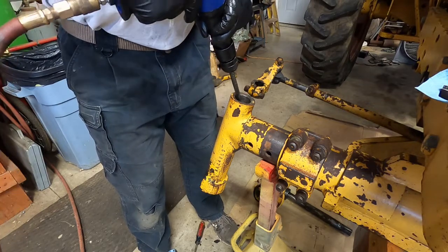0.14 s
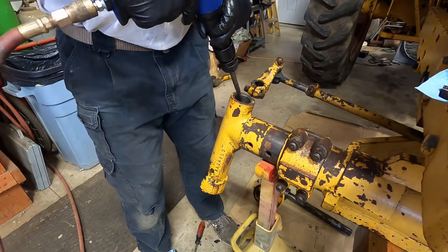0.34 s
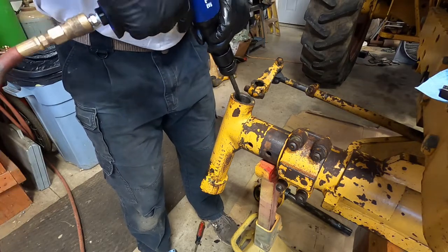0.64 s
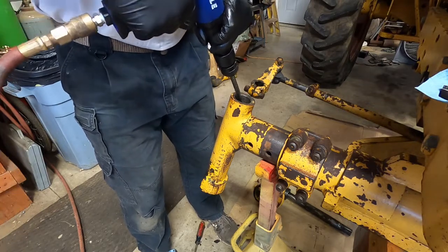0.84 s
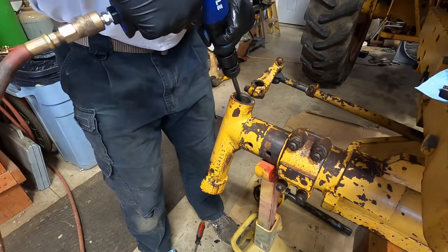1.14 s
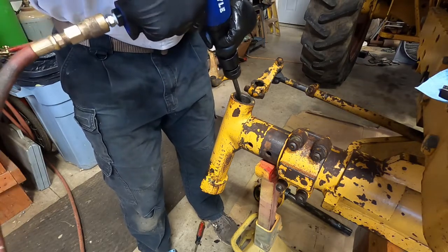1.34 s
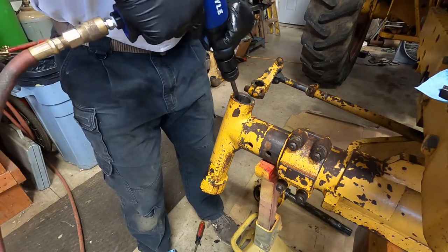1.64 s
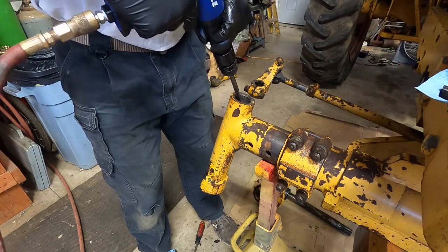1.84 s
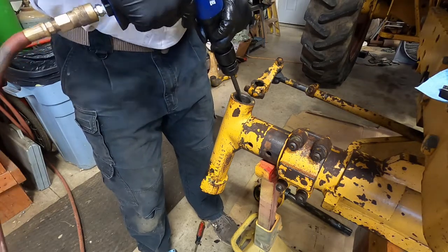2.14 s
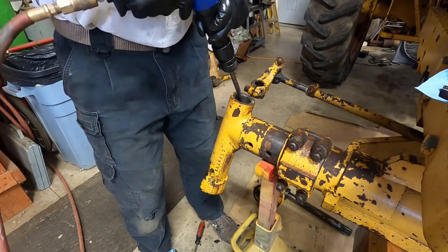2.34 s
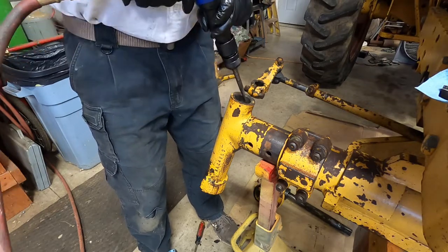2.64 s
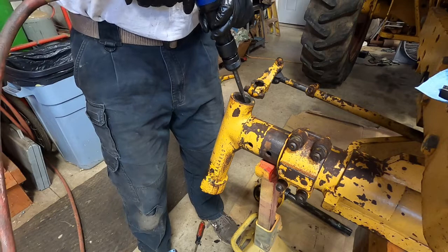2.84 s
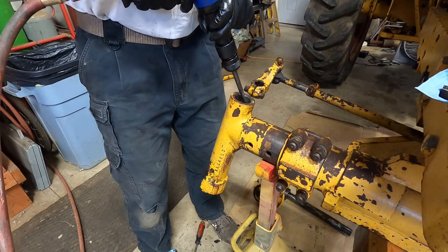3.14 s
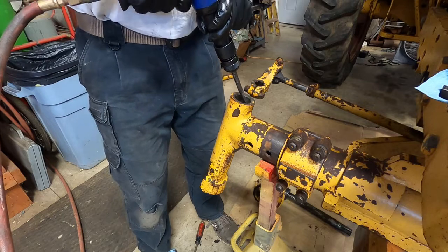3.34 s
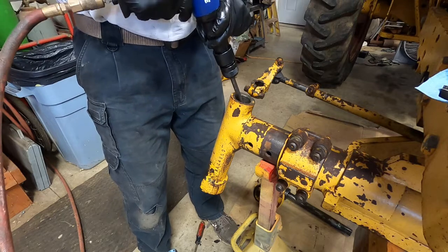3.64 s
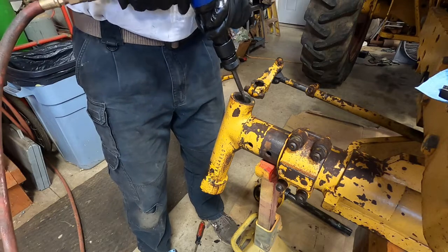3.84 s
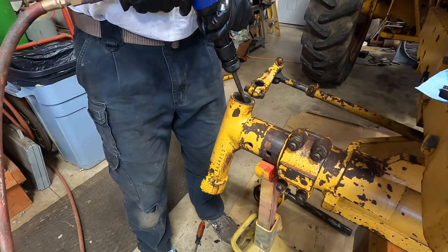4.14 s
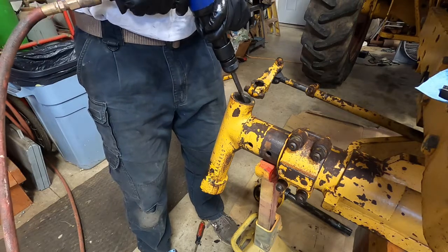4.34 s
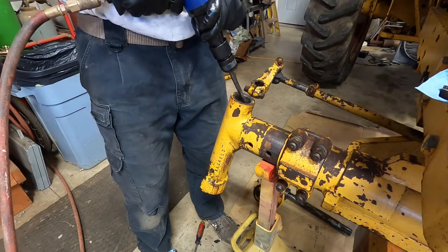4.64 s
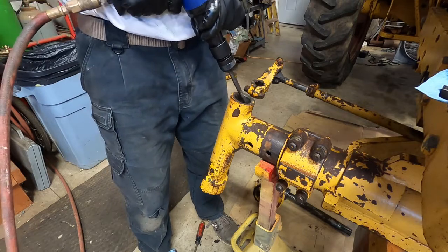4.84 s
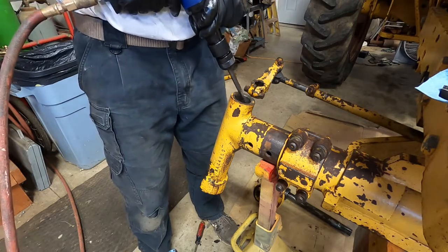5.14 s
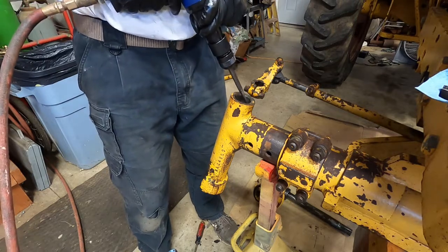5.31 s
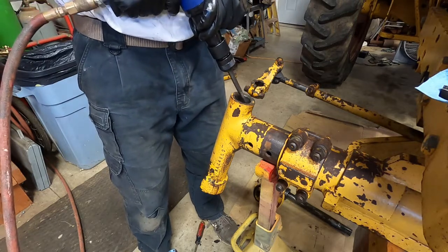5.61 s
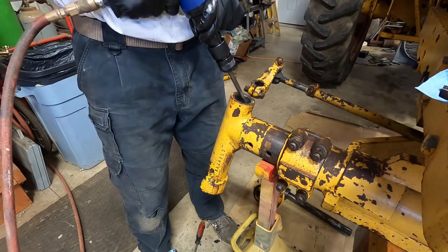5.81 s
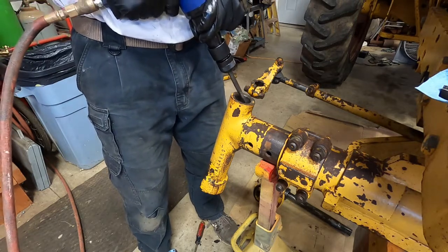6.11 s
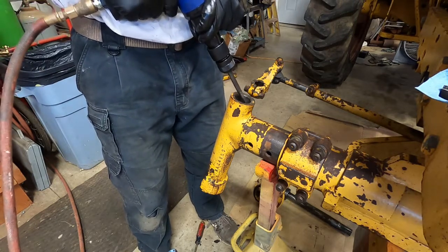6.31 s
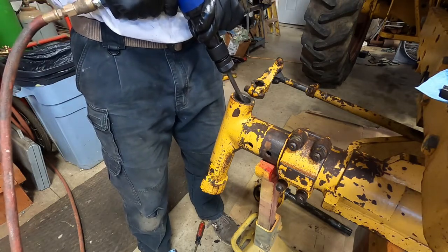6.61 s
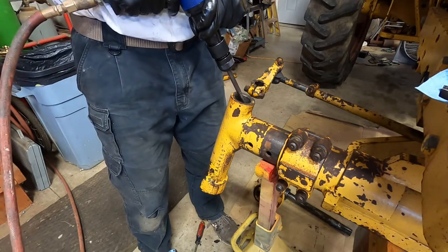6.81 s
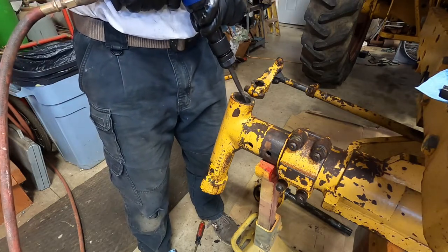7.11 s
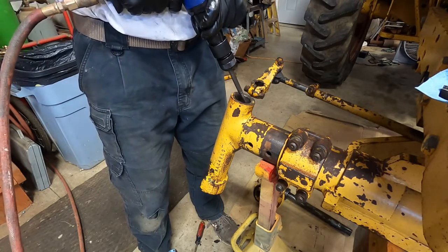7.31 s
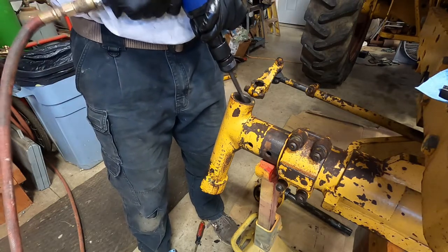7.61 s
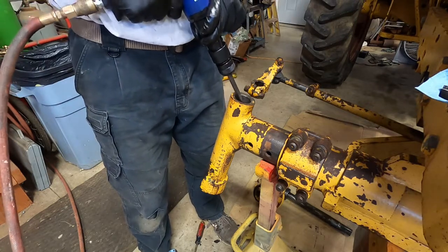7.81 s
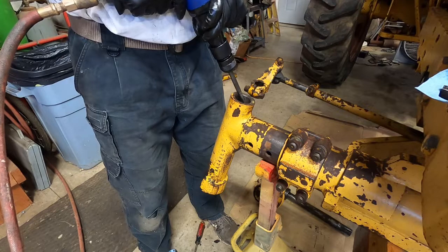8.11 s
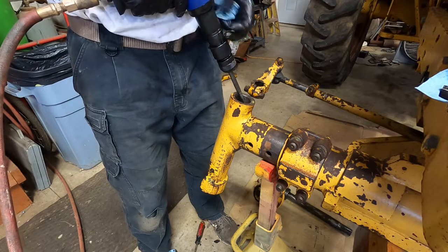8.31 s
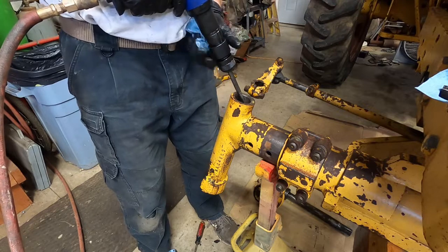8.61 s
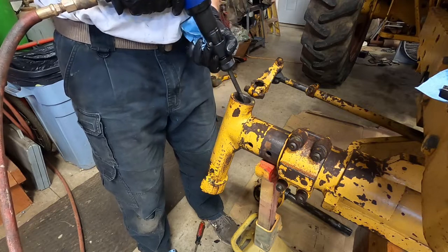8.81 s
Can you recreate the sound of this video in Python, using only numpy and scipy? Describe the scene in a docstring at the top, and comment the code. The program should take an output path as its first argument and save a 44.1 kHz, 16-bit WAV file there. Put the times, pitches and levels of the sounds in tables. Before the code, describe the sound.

Stop-start pneumatic hammering on heavy metal, each burst opening with a puff of hissing air, rings through a reverberant garage over a faint throbbing hum.

```python
"""An air hammer drives a steel bushing out of a tractor axle in short bursts, in a reverberant workshop.
Each burst opens with a rush of air: shaped noise plus a faint whistle. Each piston stroke is an
exhaust pulse with a noise spit and, a few ms later, a blow: noise crack, ringing modes, dull thud.
The loose chisel ticks and clanks, grip rubs are swelling noise; a motor hums (beating sines) and
a hose coupling leaks (hiss). Decaying noise bands form the room."""
import sys
import numpy as np
from scipy import signal
from scipy.fft import rfft, irfft, next_fast_len
from scipy.io import wavfile

SR = 44100
rng = np.random.default_rng(int(sys.argv[2]) if len(sys.argv) > 2 else 0)


def store_pcm(level_fs):
    """Save levels as 16-bit WAV."""
    pcm = np.round(np.clip(level_fs, -1, 1) * 32767).astype(np.int16)
    wavfile.write(sys.argv[1], SR, np.atleast_2d(pcm).T)


N = 395136
TIME_S = np.arange(N) / SR
MS = 1e-3

# All table levels are relative: the functions add trims.
# bursts: first stroke t/s, last stroke t/s, valve lead/s, air rush level/dB, thump level/dB,
# blow level/dB, limp/ms
BURSTS = [(1.0316, 1.1256, 0.059, -27, 3.5, -10, 0.5), (1.4159, 1.576, 0.064, -34.5, 3, -10, 5.5),
          (3.5552, 3.592, .095, -27.5, 4.5, -14.5, -2), (3.6159, 3.757, .01, -35.5, 4, -11, 0),
          (4.9533, 5.0967, 0.05, -31, 3.5, -13.5, 0), (5.8662, 6.06, 0.059, -32.5, 4, -12, 0.5),
          (6.3209, 6.7793, 0.088, -38.5, 3, -12, 7), (7.635, 8.0203, 0.049, -30.5, 3, -12, 0.5)]
# how the tool is leant on, one curve per burst: t/s, mean stroke period/ms, chisel ring level/dB
LEAN = [
    [(1.055, 30.3, -30), (1.086, 40, -43.5)],
    [(1.44, 34, -29), (1.548, 32.1, -27)],
    [(3.58, 34, -15.5)],
    [(3.638, 38, -13), (3.717, 34.8, -35.5)],
    [(4.977, 38.6, -14.5), (5.016, 38.2, -16.5), (5.056, 40.6, -51.5)],
    [(5.892, 37, -37), (5.928, 40.2, -14.5), (6.014, 45.9, -17)],
    [(6.345, 35, -21.5), (6.623, 34.1, -31), (6.656, 42.4, -19), (6.701, 32.2, -41.5), (6.735, 48.3, -31.5)],
    [(7.659, 28.9, -53.5), (7.714, 33, -17.5), (7.752, 36, -17.5), (7.79, 28.8, -35.5),
     (7.852, 44.3, -23.5), (7.905, 38, -44), (7.976, 39.8, -57)],
]
# single strokes, trigger feathered: t/s, thump level/dB, blow level/dB, chisel ring level/dB
STUTTERS = [(6.1223, -6, -42.5, -51), (6.2118, -5, -39.5, -32.5), (6.292, -0.5, -27.5, -29.5)]
# light knocks of the chisel on its seat: t/s, tick level/dB, axle ring level/dB
KNOCKS = [(0.269, -38.5, -67.5), (0.5295, -34.5, -41), (0.87, -49.5, -61.5), (1.3602, -23, -46),
          (1.652, -10.5, -31.5), (1.7957, -15, -41.5), (1.9066, -36.5, -44), (2.242, -46.5, -54.5),
          (2.2724, -64.5, -50.5), (2.5046, -40, -63), (2.588, -42.5, -57), (2.9097, -55, -43.5),
          (3.1074, -40.5, -49.5), (3.1873, -50, -40.5), (3.937, -17.5, -34), (4.2609, -23, -37),
          (5.2863, -21, -32.5), (5.3072, -17.5, -59.5), (6.2286, -10.5, -27), (7.0399, -24, -41.5),
          (7.2971, -49.5, -48.5), (8.0995, -10.5, -38), (8.1904, -24, -62.5)]
# gloves and hose rubbing: start t/s, end t/s, centre f/Hz, level/dB
RUBS = [(2.474, 2.843, 680, -65.5), (3.046, 3.425, 1750, -60), (8.662, 8.89, 2420, -71)]
# background: t/s, hum level/dB, leak level/dB
BACKGROUND = [(0.1, -49.5, -70), (0.72, -50, -65.5), (0.9, -55, -62.5), (2.1, -58.5, -70),
              (2.676, -49.5, -63.5), (3.42, -39, -60), (4.25, -57.5, -70), (4.356, -50, -70),
              (4.88, -45, -63), (5.55, -48.5, -71), (5.768, -49, -66.5), (7.15, -49, -74),
              (7.532, -43.5, -68), (8.45, -51.5, -81), (8.9, -44, -69.5)]
# beating motor tones: mean f/Hz, level/dB
HUM = [(88.8, 0), (72, -2.5), (75, -17.5), (228, -17)]

# modes of chisel and bushing: f/Hz, level/dB, t60/s
CHISEL_MODES = [(960, -7, 0.075), (2570, -4.5, 0.046), (2910, -0.5, 0.023), (3126, -7.5, .03),
                (3800, -11.5, 0.045), (5390, -10, 0.022), (6170, -19.5, .03), (7900, -25, 0.025),
                (7900, -21, 0.092)]
# main modes of the axle housing: f/Hz, level/dB, t60/s
AXLE_MODES = [(730.6, -2, 0.55), (912, -3, 0.31), (1015.3, -0.5, 0.24), (1102, -5.5, .25),
              (1437, -6.5, 0.16), (2617, -6.5, .2)]
# standing waves between floor and tractor: f/Hz, level/dB, t60/s
BOOM_MODES = [(141, -4.5, 0.081), (172.5, -0.5, 0.14), (232, 3, 0.14)]

# exhaust turbulence, also after-hits: f/Hz, level/dB per Hz
SPIT_COLOUR = [(300, 1), (600, 3), (1000, 15), (1700, 0.5), (3000, 2.5), (4300, 8.5), (5800, -10),
               (8200, -1), (10200, -4), (12000, -20.5), (16000, -33)]
# piston on chisel: f/Hz, level/dB per Hz
CRACK_COLOUR = [(400, -24.5), (1200, -0.5), (3000, -1.5), (5000, -7.5), (6300, 0.5), (8500, -1), (9300, -5),
                (11000, -12.5), (12500, -34.5), (16000, -37)]
# air through the opening valve: f/Hz, level/dB per Hz
RUSH_COLOUR = [(1200, -9.5), (3000, -10.5), (3700, -7.5), (5300, -20), (7200, -4), (10300, 2), (12000, -11),
               (16000, -21)]
# hose coupling leak: f/Hz, level/dB per Hz
LEAK_COLOUR = [(1760, -44.5), (3000, -7.5), (3230, -3.5), (6460, 0.5), (7150, -3), (11900, -10),
               (15000, -17)]
# dull shop noise: f/Hz, level/dB per Hz
SHOP_COLOUR = [(15, -66.5), (25, -24), (87, -9.5), (201, -19), (235, -22.5), (622, -42), (711, -32),
               (777, -43), (5000, -49.5), (6500, -83.5), (11000, -120)]
# light touch of the chisel: f/Hz, level/dB per Hz
TICK_COLOUR = [(400, -22), (1200, -5.5), (2600, 2), (4200, -3), (5500, -6), (7300, -4.5), (9500, -14),
               (14000, -30)]
# casting under a hard blow: f/Hz, level/dB per Hz
CLANG_COLOUR = [(200, -17), (390, 1.5), (540, -4.5), (730, -5), (1000, -3), (1350, -10.5), (3000, -11),
                (6000, -33.5)]
# casting under a soft knock: f/Hz, level/dB per Hz
CLUNK_COLOUR = [(200, -20), (390, -0.5), (540, -6.5), (730, -0.5), (1050, -7.5), (1600, -16), (3000, -20.5),
                (6000, -42)]

# hall response by band: centre f/Hz, level/dB, tail t60/s
ROOM = [(60.3, -24.5, 1.3), (180, -13, 0.73), (452, -8.5, 0.73), (700, -7.5, 0.61), (1400, -11, 0.48),
        (3600, -15.5, 0.62), (7840, -14.5, 0.39), (14000, -19, 0.9)]
# left-right likeness of noise: f/Hz, likeness/1
LIKENESS = [(30, .9), (200, .93), (1000, 0.77), (3000, 0.75), (8000, .6)]
# left microphone against right: f/Hz, level/dB
LEFT_COLOUR = [(60, -1), (130, 2), (640, 0), (4000, 1), (8000, 0.6), (13000, -2)]
# left microphone against right: f/Hz, phase lead/rad
LEFT_PHASE = [(200, 0), (900, -.15), (3200, -0.66), (8300, -0.44), (15000, 0.15)]

# first stroke, from rest: short, barely strikes; thump and blow relative to its burst
FIRST_PERIOD_MS, FIRST_TRAVEL_MS = 23.5, 1.4
FIRST_THUMP_DB, FIRST_BLOW_DB, FIRST_RING_DB = -6, -21, -36.5
# long, ringing strokes alternate with short, dead ones
LIMP_SETTLES_S, LIMP_DB_PER_MS = .25, 0.97
# pressure sinks through a burst and collapses at its end
SAG_DB_PER_S, BLEED_S, BLEED_DB = 9.5, 0.013, -4.5
# exhaust puff to blow; the second is added as air runs out
TRAVEL_MS, SLOW_TRAVEL_MS = 3.8, 0.96
# turbulence is strongest just after the valve opens
SPIT_DB, SPIT_FALL_DB, SPIT_FALL_S, SPIT_BLEED_DB = -13.5, -8, 0.084, -10.5
STUTTER_SPIT_DB = -17.5  # relative to the thump
# around this ring level the chisel comes loose: softer crack, piston rebounds; both scale with looseness
LOOSE_DB, LOOSE_WIDTH_DB, LOOSE_BLOW_DB = -27.5, 0.5, -3.5
REBOUND_S, REBOUND_DB, REBOUND_SPIT_DB = .0195, -2.5, -18
BUFFET_DB, BUFFET_HZ, BUFFET_T60_S = -32, 75, .2
THUD_DB, THUD_LOW_HZ, THUD_HIGH_HZ = -7.5, 93, 900
AFTER_T60_S = 0.0098
WHISTLE_DB, WHISTLE_SCATTER_DB, WHISTLE_SPREAD = -2, 3, .015
BOUNCE_S, BOUNCE_DB = .032, -7.5
SHIMMER_LOW_HZ, SHIMMER_HIGH_HZ = 1102, 9980
SHIMMER_DB, SHIMMER_TILT_DB_PER_OCTAVE, SHIMMER_T60_S = -21, -2, .12
CUTOFF_HZ = 16500  # stopband edge


def from_db(db):
    """Decibels to gain."""
    return 10 ** (np.asarray(db) / 20)


def rms_one(x):
    """Scale to rms 1."""
    return x / np.sqrt(np.mean(x ** 2) + 1e-20)


def at_hz(points, hz):
    """Read a table on a log-frequency axis."""
    knots, values = np.transpose(points)
    return np.interp(np.log(hz + 1), np.log(knots), values)


def stereo_bins(size):
    """Frequencies and spectrum of white noise at two microphones, more alike in the bass."""
    hz = np.arange(size // 2 + 1) * SR / size
    mid, side = rfft(rng.standard_normal((2, size)))
    alike = np.clip(at_hz(LIKENESS, hz), 0, 1)
    shared = np.sqrt((1 + alike) / 2) * mid
    opposed = np.sqrt((1 - alike) / 2) * side * [[1], [-1]]
    return hz, shared + opposed


def noise(colour):
    """Stereo noise of a given colour, rms 1."""
    hz, bins = stereo_bins(next_fast_len(N))
    return rms_one(irfft(bins * from_db(at_hz(colour, hz)))[:, :N])


def drift(rate_hz):
    """Slow chance: unit-normal knots joined by straight lines."""
    knots_s = np.arange(0, N / SR + 1, 1 / rate_hz)
    return np.interp(TIME_S, knots_s, rng.standard_normal(len(knots_s)))


def clicks(times_s, db):
    """One impulse per event."""
    samples = np.round(times_s * SR).astype(int)
    return np.bincount(samples, from_db(db), N)[:N] + 1e-18  # offset avoids denormals


def fade(hits, t60_s):
    """Each impulse becomes an envelope that jumps up and dies away."""
    return signal.lfilter([1], [1, -from_db(-60 / (t60_s * SR))], hits)


def band_pass(x, low_hz, high_hz):
    """Second-order Butterworth band-pass."""
    return signal.sosfilt(signal.butter(2, [low_hz, high_hz], "band", fs=SR, output="sos"), x)


def struck(modes, times_s, db, scatter_db):
    """Each touch rings every mode at a random strength; neighbouring modes start in opposite senses."""
    out = np.zeros(N)
    for k, (hz, mode_db, t60_s) in enumerate(modes):
        r = from_db(-60 / (t60_s * SR))
        w = 2 * np.pi * hz / SR
        hits = clicks(times_s, db + mode_db + scatter_db * rng.standard_normal(len(times_s)))
        out += signal.lfilter([0, (-1) ** k * np.sin(w)], [1, -2 * r * np.cos(w), r * r], hits)
    return out


def shimmer(times_s, db, count=40):
    """Dense, faint upper modes of bushing and axle give each touch a metallic sheen."""
    spaced_hz = np.geomspace(SHIMMER_LOW_HZ, SHIMMER_HIGH_HZ, count)
    scattered_hz = spaced_hz * np.exp(rng.normal(0, 0.026, count))
    levels_db = SHIMMER_DB + SHIMMER_TILT_DB_PER_OCTAVE * np.log2(scattered_hz / SHIMMER_LOW_HZ)
    modes = [(hz, mode_db, SHIMMER_T60_S) for hz, mode_db in zip(scattered_hz, levels_db)]
    return struck(modes, times_s, db, scatter_db=2)


def casting(times_s, db, t60_s, colour):
    """The heavy casting has so many short modes that they merge into one noise-like clang."""
    return fade(clicks(times_s, db), t60_s) * noise(colour)


def background():
    """A throbbing motor hum swells with dull shop noise; a thin leak hisses at the hose coupling."""
    s, *columns = np.vstack(BACKGROUND).T
    hum_db, leak_db = [np.interp(TIME_S, s, c) for c in columns]
    warped_s = np.cumsum(1 + 0.0034 * drift(2.1)) / SR  # wavering motor speed
    tones = sum(from_db(db) * np.sin(2 * np.pi * hz * warped_s) for hz, db in HUM)
    hum = from_db(hum_db + 1.5) * tones
    shop = from_db(0.21 * hum_db - 44.5) * noise(SHOP_COLOUR)
    leak = from_db(leak_db - 3.5) * noise(LEAK_COLOUR)
    return hum + shop + leak


def knocks():
    """The loose chisel ticks and drops back, the axle clanks; an earlier clank is still dying away."""
    s, tick_db, axle_db = np.transpose(KNOCKS)
    tick = from_db(-7) * fade(clicks(s, tick_db), t60_s=.009) * noise(TICK_COLOUR)
    touches_s = np.r_[s, s + BOUNCE_S]
    touch_db = np.r_[axle_db, axle_db + BOUNCE_DB]
    axle = struck(AXLE_MODES, touches_s, touch_db - 7, scatter_db=0.5)
    clunk = casting(touches_s, touch_db - 1.5, t60_s=0.12, colour=CLUNK_COLOUR)
    dying = casting(np.zeros(1), np.array([-50]), t60_s=0.6, colour=CLANG_COLOUR)
    chisel = struck(CHISEL_MODES, s, np.maximum(tick_db, axle_db) - 19, scatter_db=4)
    return tick + axle + clunk + dying + chisel + shimmer(s, axle_db - 2)


def workshop(x, early_t60_s, early_db, gap_s, build_s):
    """Floor and tractor return dense early sound; the hall's tail builds slowly, decaying by band."""
    size = 2 * SR
    t = TIME_S[:size]
    hz, bins = stereo_bins(size)
    centres_hz, response = np.array(ROOM)[:, 0], 0
    early = from_db(early_db) * rms_one((t > gap_s) * from_db(-60 * t / early_t60_s))
    for share, (_, db, t60_s) in zip(np.eye(len(ROOM)), ROOM):
        band = irfft(bins * at_hz(np.c_[centres_hz, share], hz))  # triangular, overlapping bands
        tail = rms_one(np.clip(t / build_s, 0, 1) * from_db(-60 * t / t60_s))
        response = response + band * from_db(db) * np.hypot(early, tail) / np.sqrt(size)
    return signal.fftconvolve(x.mean(axis=0)[None], response, axes=1)[:, :N]


def air_rush(whistle_hz, rise_hz):
    """Air hisses as the valve opens; a faint whistle, new each pull, rises and breaks up before the piston."""
    hiss_gain, whistle = np.zeros(N), np.zeros(N)
    chances = rng.standard_normal((len(BURSTS), 2))
    for (first_s, last_s, lead_s, db, *_), (pitch_chance, level_chance) in zip(BURSTS, chances):
        span = slice(int((first_s - lead_s) * SR), int(last_s * SR))
        t = TIME_S[span]
        opening = np.clip(1 + (t - first_s) / lead_s, 0, 1)
        running = np.sqrt(np.clip((t - first_s) / (last_s - first_s), 0, 1))
        hiss_gain[span] = opening * from_db(db - 2.7 * (2.5 - opening) - 23 * running)
        jitter_hz = (450 + 2200 * opening ** 3) * rng.standard_normal(N)[span]
        pitch_hz = whistle_hz * (1 + WHISTLE_SPREAD * pitch_chance) + rise_hz * opening ** 3 + jitter_hz
        level_db = db + 6 - 30 * (1 - opening) - 45 * running
        level_db = level_db + WHISTLE_DB + WHISTLE_SCATTER_DB * level_chance
        whistle[span] = opening * from_db(level_db) * np.sin(2 * np.pi * np.cumsum(pitch_hz) / SR)
    return hiss_gain * noise(RUSH_COLOUR) + whistle


def burst_strokes(burst, lean):
    """Rows of one burst: t/s, thump/dB, spit/dB, blow t/s, blow/dB, ring/dB, looseness 0-0.5."""
    first_s, last_s, _, _, thump_db, blow_db, limp_ms = burst
    knots_s, periods_ms, rings_db = np.transpose(lean)
    rows = [(first_s, thump_db + FIRST_THUMP_DB, SPIT_DB, first_s + FIRST_TRAVEL_MS * MS,
             blow_db + FIRST_BLOW_DB, FIRST_RING_DB, 0)]
    s, swing_ms = first_s + FIRST_PERIOD_MS * MS, limp_ms
    while s < last_s + periods_ms[-1] * MS / 2:
        age_s = s - first_s
        spent = np.exp(-max(last_s - s, 0) / BLEED_S)
        limp_now_ms = swing_ms * np.exp(-age_s / LIMP_SETTLES_S)
        ring_db = np.interp(s, knots_s, rings_db) + LIMP_DB_PER_MS * limp_now_ms
        loose = 1 / (2 + np.exp((LOOSE_DB - ring_db) / LOOSE_WIDTH_DB))
        sag_db = SAG_DB_PER_S * age_s
        spit_db = SPIT_DB + SPIT_FALL_DB * (1 - np.exp(-age_s / SPIT_FALL_S)) + SPIT_BLEED_DB * spent
        blow_s = s + (TRAVEL_MS + SLOW_TRAVEL_MS * spent) * MS
        rows.append((s, thump_db - sag_db + BLEED_DB * spent, spit_db, blow_s,
                     blow_db - sag_db + LOOSE_BLOW_DB * loose, ring_db, loose))
        s += (np.interp(s, knots_s, periods_ms) + limp_now_ms) * MS
        swing_ms = -swing_ms
    return rows


def strokes():
    """Every piston stroke, in bursts or alone, as columns."""
    rows = [row for burst, lean in zip(BURSTS, LEAN) for row in burst_strokes(burst, lean)]
    for s, thump_db, blow_db, ring_db in STUTTERS:
        rows.append((s, thump_db, thump_db + STUTTER_SPIT_DB, s + TRAVEL_MS * MS, blow_db, ring_db, 0))
    return np.transpose(rows)


def air_pulse(hits, low_hz, high_hz, swing_hz, width_hz):
    """A slug of vented air is a soft pressure pulse that swings out and back in the exhaust port."""
    r = np.exp(-np.pi * width_hz / SR)
    port = np.array([1, -2 * r * np.cos(2 * np.pi * swing_hz / SR), r * r])
    slug = band_pass(signal.unit_impulse(SR // 10), low_hz, high_hz)
    pulse = signal.lfilter(port[::-1], port, -slug)  # all-pass
    return signal.oaconvolve(hits, pulse / np.abs(pulse).max())[:N]


def exhaust(s, pulse_db, spit_db, loose):
    """Strokes and rebounds vent a thump of air with a turbulent spit; strokes also boom and buffet the mics."""
    vents = clicks(s, pulse_db)
    rebounds = clicks(s + REBOUND_S, pulse_db + REBOUND_DB + 20 * np.log10(loose + 1e-9))
    thumps = air_pulse(vents + rebounds, low_hz=39.7, high_hz=256, swing_hz=202.5, width_hz=350)
    boom = struck(BOOM_MODES, s + .007, pulse_db - 32, scatter_db=7)
    spits = fade(clicks(s, spit_db) + from_db(REBOUND_SPIT_DB) * rebounds, t60_s=0.03)
    low_pass = signal.butter(2, BUFFET_HZ, fs=SR, output="sos")
    eddies = rms_one(signal.sosfilt(low_pass, rng.standard_normal((2, N))))  # separate per microphone
    buffet = from_db(BUFFET_DB) * fade(vents, BUFFET_T60_S) * eddies
    return from_db(-10.5) * thumps + boom + spits * noise(SPIT_COLOUR) + buffet


def blows(at_s, blow_db, ring_db):
    """Piston meets chisel with a crack; chisel and axle ring, loose after-hits follow, the casting recoils."""
    hits = clicks(at_s, blow_db)
    crack_gain = fade(hits, t60_s=0.01) + from_db(-11) * fade(hits, t60_s=0.036)
    crack = crack_gain * noise(CRACK_COLOUR)
    chisel = struck(CHISEL_MODES, at_s, ring_db, scatter_db=2.5)
    sheen = shimmer(at_s, (ring_db + blow_db) / 2 - 6)
    axle = struck(AXLE_MODES, at_s, ring_db - 21, scatter_db=4.5)
    clang = casting(at_s, ring_db - 3, t60_s=.1, colour=CLANG_COLOUR)
    # three after-hits per blow
    lags_s = rng.uniform(.004, .026, size=(len(at_s), 3))
    after = sum(clicks(at_s + lag_s, (blow_db + ring_db) / 2 - 9.5) for lag_s in lags_s.T)
    chatter = fade(after, AFTER_T60_S) * noise(SPIT_COLOUR)
    # recoil: one short, dull pulse
    thud = band_pass(-hits, THUD_LOW_HZ, THUD_HIGH_HZ) * SR / (np.pi * THUD_HIGH_HZ)
    return crack + chisel + sheen + axle + clang + chatter + from_db(THUD_DB) * thud


def rubs():
    """Soft, uneven friction while the grip is shifted."""
    out = 0
    for start_s, end_s, hz, db in RUBS:
        swell = np.sin(np.pi * np.clip((TIME_S - start_s) / (end_s - start_s), 0, 1))
        friction = noise([(hz / 4, -45), (hz, 0), (hz * 8, -50)])
        out = out + swell * from_db(db + drift(31)) * friction
    return out


def scene():
    """The hammer close by, in its room."""
    s, thump_db, spit_db, blow_s, blow_db, ring_db, loose = strokes()
    hammer = knocks() + air_rush(whistle_hz=3490, rise_hz=530)
    hammer = hammer + exhaust(s, thump_db, spit_db, loose) + blows(blow_s, blow_db, ring_db)
    room = workshop(hammer, early_t60_s=0.11, early_db=-3, gap_s=0.0054, build_s=0.14)
    return hammer + room + rubs() + background()


def record(dry):
    """Left microphone has its own colour and phase and less deep bass; peaks are rounded, the top is cut."""
    hz = np.fft.rfftfreq(N, 1 / SR)
    left_response = from_db(at_hz(LEFT_COLOUR, hz)) * np.exp(1j * at_hz(LEFT_PHASE, hz))
    coloured = irfft(rfft(dry[0]) * left_response, N)
    left = signal.sosfilt(signal.butter(1, 42, "high", fs=SR, output="sos"), coloured)
    rounded = 1.1 * np.tanh(np.array([left, dry[1]]) / 1.1)
    return signal.sosfilt(signal.cheby2(16, 70, CUTOFF_HZ, fs=SR, output="sos"), rounded)


dry = scene()
out = record(dry)
store_pcm(out)
```